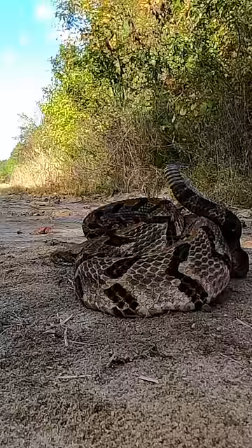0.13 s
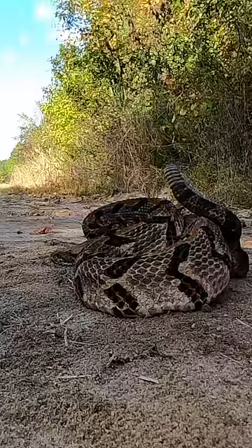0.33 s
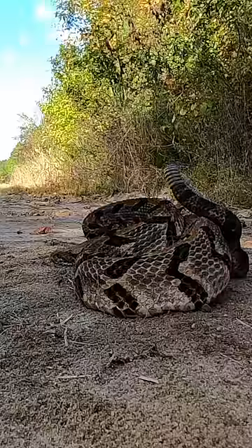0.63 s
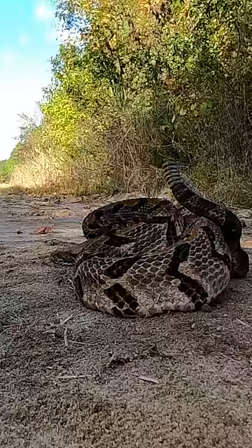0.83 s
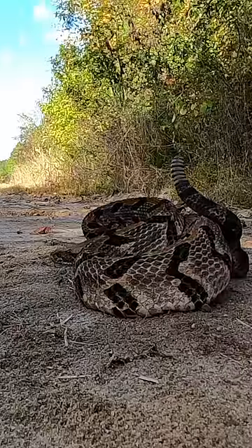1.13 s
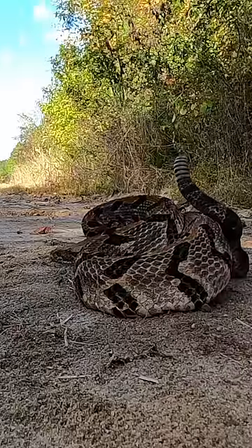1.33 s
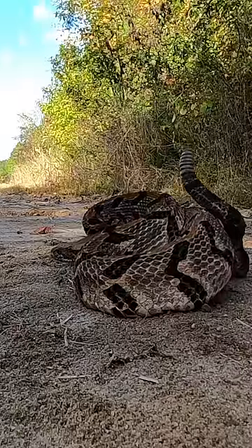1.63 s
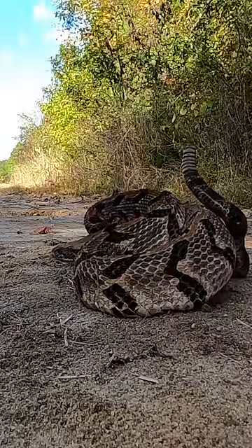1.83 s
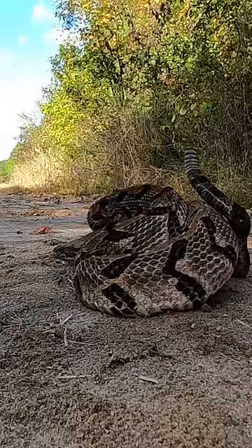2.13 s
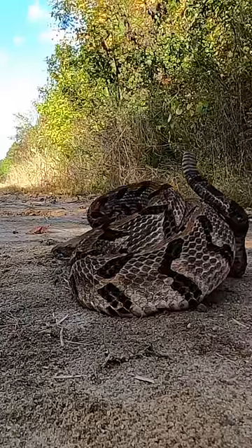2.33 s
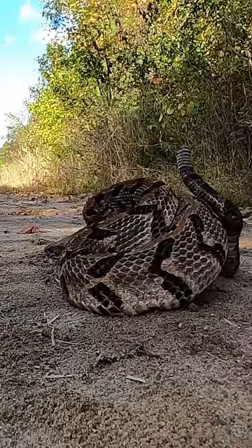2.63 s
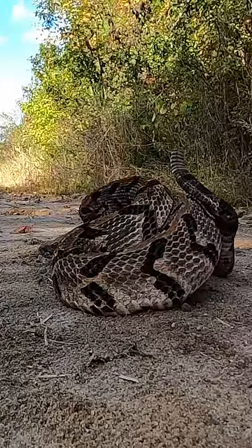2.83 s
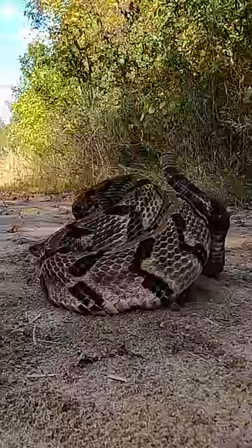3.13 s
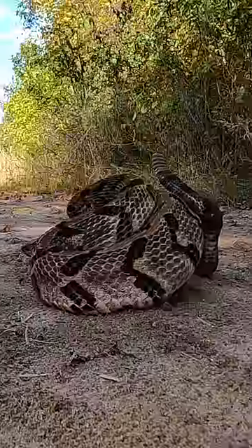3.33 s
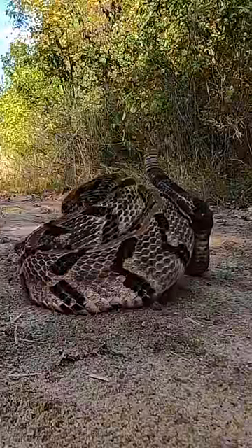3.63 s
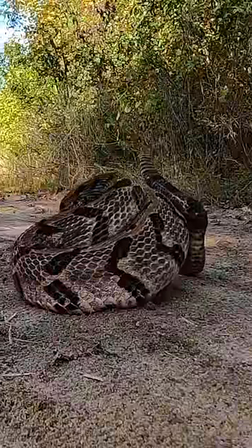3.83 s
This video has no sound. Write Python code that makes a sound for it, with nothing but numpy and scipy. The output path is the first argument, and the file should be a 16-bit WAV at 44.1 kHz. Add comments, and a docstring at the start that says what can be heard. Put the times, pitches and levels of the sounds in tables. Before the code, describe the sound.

A rattlesnake's rattle is the main sound, close and outdoors. First, two quieter footsteps thud and crunch on gritty sand to the left, at about 0.1 and 0.7 seconds. Near 1 second the tail gives one brief twitch, then a loud, dry, fast buzzing hiss holds steady until the end at 4 seconds. Faint distant rumble, thin insect hiss and wind on the microphone drop back once the rattling starts.

```python
"""Rattlesnake on a sandy track

Two footsteps thud and crunch on the left. A coiled rattlesnake twitches its tail once, then shakes it
about 58 times a second: the hollow segments clack together in four clusters per shake.
A distant rumble, a thin hiss of insects and wind on the microphone drop back when the rattle starts."""
import sys
import numpy as np
from scipy import signal
from scipy.fft import rfft, irfft
from scipy.io import wavfile

SR = 44100
rng = np.random.default_rng(int(sys.argv[2]) if len(sys.argv) > 2 else 0)


def digitize_waveform(pressure):
    """Quantize a signal to 16-bit integers and store it at the path in sys.argv[1].

    Rows of a 2-D input are taken as channels; values are limited to [-1, 1].
    """
    field = np.atleast_2d(pressure).T
    bounded = np.clip(field, -1, 1)
    quanta = np.round(bounded * 32767).astype(np.int16)
    wavfile.write(sys.argv[1], SR, quanta)


N = 176400  # 4 seconds

# The four moments in each shake when the segments collide: place (0 to 1), relative_db
CLACK_CLUSTERS = [(.0, -6.5), (.23, -1.5), (.5, -7), (.72, 1)]


def rattle():
    """Hollow tail segments collide: many small clacks bunch at each turn, with harder knocks on top."""
    # How hard the tail rattles: time_s, level_db
    shake_levels = [(.9572, -38), (.9595, -24), (.97, -18), (.973, -28), (.978, -22), (.989, -22),
                    (.996, -32), (1.021, -32), (1.024, -37), (1.04, -40), (1.048, -21.5), (1.1, -21),
                    (1.4, -21.5), (1.9, -20.5), (2.9, -20.5), (3.85, -21), (4, -22)]
    # How fast the tail shakes: time_s, shakes_per_s
    shake_speeds = [(1.0, 56), (1.2, 57.9), (1.5, 59.7), (1.8, 59.1), (2.4, 58.6), (3.0, 58.1), (3.6, 57.9),
                    (4.0, 57.3)]
    # Tone of the rattle together with its reflection off the ground: pitch_hz, early_db, late_db
    rattle_tone = [(300, -32.5, -29.5), (516, -20.5, -26), (753, -17, -19), (1000, -11, -9),
                   (1290, -10, -11), (2070, -10, -10.5), (2260, -6, -11), (2760, 1.5, -2), (3550, 2, -7),
                   (4000, 4.5, 3), (4490, 2, 2.5), (4907, -12, 4), (5280, -1, 0.5), (5670, 0.5, 3),
                   (6300, -1, 3), (7330, -0.3, 0.2), (7900, -6, -5.5), (8130, -3.5, -4),
                   (10900, -14, -11.5), (12500, -23, -18), (14100, -20.5, -26), (15500, -20, -28)]
    # The tone shifts as the microphone nears and the ground reflection changes: time_s, late_share (0 to 1)
    tone_change = [(1.4, 0.18), (2.3, 0.58), (3.2, 0.91)]
    # Tone of the diffuse rattle, with the microphone's narrow dip near 8 kHz: pitch_hz, relative_db
    diffuse_tone = [(200, 3), (1000, -4), (4000, 0), (7200, -2), (7700, -18), (8200, -18), (8600, 0),
                    (12000, -1), (15000, 2.5)]
    # Low hum of the swinging tail: multiple of the shake rate, relative_db
    swing_tones = [(3, -70), (5, -67), (9, -64.5), (12, -64), (14, -64)]
    cluster_width, loose_share = .064, .56  # share of a shake; share of clacks that fall anywhere
    (level_db,), (speed,), (late_share,) = map(over_time, (shake_levels, shake_speeds, tone_change))
    shakes = np.cumsum(speed) / SR  # shakes counted so far
    bunching = sum(amp(db) * np.exp(-.5 * (((shakes - place + .5) % 1 - .5) / cluster_width) ** 2)
                   for place, db in CLACK_CLUSTERS)
    clacks_per_s = 6000 * (loose_share + (1 - loose_share) * bunching / bunching.mean())
    # Three versions: one arrives directly, two make a diffuse sound on the left and right.
    clacks = contacts(clacks_per_s, spread_db=-.5, fade_s=.006, tick_db=5.5, versions=3)
    clacks[0] = unit_level(clacks[0] + amp(-5) * knocks(shakes))
    strength = amp(level_db) * (np.arange(N) > shake_levels[0][0] * SR)
    clacks = clacks * strength * amp(.19 * drift(24))
    early = colour(clacks, rattle_tone, column=1)
    late = colour(clacks, rattle_tone, column=2)
    direct, *diffuse = (1 - late_share) * early + late_share * late
    diffuse = amp(-6.5) * colour(np.array(diffuse), diffuse_tone)
    hum = sum(amp(db + 5.5) * np.sin(2 * np.pi * (k * shakes + rng.random())) for k, db in swing_tones)
    return microphone_ports(direct) + diffuse + hum * strength / strength.max()


def knocks(shakes):
    """Each turn of the tail throws the segments together: a tick and a short ring, never twice alike."""
    # The notes at which the hollow segments ring: pitch_hz, fade_s (time to fall 60 dB)
    segment_notes = [(2850, 0.0028), (3500, 0.0025), (4150, 0.0053), (5700, 0.0017), (6400, 0.0036),
                     (7000, 0.0033), (8800, 0.0047)]
    jitter_s, stagger_s, spread_db, ring_db = .0003, .0002, 1.4, -20
    places, cluster_db = np.transpose(CLACK_CLUSTERS)
    shake_count = int(shakes[-1])
    turns = (np.arange(shake_count)[:, None] + places).ravel()
    chance = rng.standard_normal((len(turns), 3 + 2 * len(segment_notes)))
    on_time = np.interp(turns, shakes, np.arange(N))
    starts = np.clip(on_time + jitter_s * SR * chance[:, 0], 0, N - 1).astype(int)
    sizes = amp(np.tile(cluster_db, shake_count) + spread_db * np.clip(chance[:, 1], -2, 2))
    sound = np.zeros(N)
    sound[starts] = sizes * np.sign(chance[:, 2])  # the bare ticks
    for k, (pitch_hz, fade_s) in enumerate(segment_notes):
        clicks = np.zeros(N)
        stagger = (stagger_s * SR * chance[:, -1 - k]).astype(int)
        clicks[np.clip(starts + stagger, 0, N - 1)] = sizes * amp(ring_db) * np.tanh(chance[:, 3 + k])
        sound += ring(clicks, pitch_hz, fade_s)
    return unit_level(sound)


def footsteps():
    """Heels thud in the middle; crunches, snaps and a skid reach the right side later and quieter."""
    left_db, right_db, right_delay_s = 1.5, -14, .00022
    t = np.arange(N) / SR
    cracking = snaps(t)
    crunch, right_crunch = grit_crunch(t)
    left = crunch + cracking + pebble_skid(t)
    right = np.interp(t - right_delay_s, t, left) + 1.6 * right_crunch
    return heel_thuds() + np.array([left * amp(left_db), right * amp(right_db)])


def grit_crunch(t):
    """Grains of grit grind under the sole until it lifts. Gives two versions of the same crunch."""
    # The crunch under the foot, one list per step: time_s, level_db, treble_db (relative to level_db)
    step_levels = [
        [(0.112, -71, -15), (0.118, -40, -19), (0.176, -43.5, -11), (0.19, -47.5, -13), (0.212, -42.5, -21),
         (0.272, -52.5, -16), (0.28, -54, -22), (0.29, -58, -17), (0.33, -74, -7)],
        [(0.698, -67, -12), (0.702, -44.5, -19), (0.752, -38, -18), (0.788, -45.5, -11), (0.803, -39.5, -23),
         (0.828, -45, -17), (0.85, -47, -17), (0.93, -68, -10)],
    ]
    # Tone of the grit: pitch_hz, relative_db
    grit_tone = [(470, -64), (800, -38), (989, -18), (1390, -11), (2000, 0), (4240, -4), (8000, -9.5),
                 (10400, -49), (17600, -120)]
    split_hz = 8000
    body_gain, treble_gain = np.zeros((2, N))
    for step in step_levels:
        level_db, treble_db = over_time(step)
        foot_down = (t > step[0][0]) & (t < step[-1][0])
        body_gain += foot_down * amp(level_db)
        treble_gain += foot_down * amp(level_db + treble_db)
    grit = contacts(per_s=2900 * amp(2 * drift(40)), spread_db=2.5, fade_s=.0073, tick_db=2.6, versions=2)
    body = let_through(colour(grit, grit_tone), "low", split_hz, order=3)
    softened = signal.lfilter([1, 1], [1], grit)
    treble = let_through(softened, "high", split_hz, order=3)
    return body_gain * body + treble_gain * unit_level(treble)


def snaps(t):
    """Pebbles and twigs snap underfoot, each in a short run of cracks that sets it ringing."""
    # One row per snap: start_s, peak_db, pitch_hz, fade_s, top_hz
    snap_list = [(0.0533, -28, 1530, 0.0062, 2620), (.1185, -30, 4200, .002, 9000),
                 (.1305, -38, 3000, .002, 6000), (.1782, -27, 4500, .0015, 14000),
                 (.2155, -31, 4700, .005, 7000), (0.2798, -32, 1580, 0.0059, 4500),
                 (.7036, -31, 2090, 0.0046, 9000), (.7246, -25, 3200, .002, 7500),
                 (.7472, -26, 3470, .002, 6500), (0.75, -36, 3300, .003, 6000),
                 (.779, -29, 4000, .003, 6000), (.8088, -20, 2500, .0015, 12000),
                 (.868, -32.5, 1700, 0.0071, 3500)]
    crumble_s = .00008
    sound = np.zeros(N)
    for start_s, peak_db, pitch_hz, fade_s, top_hz in snap_list:
        cracks = (t >= start_s) * np.exp(-np.maximum(t - start_s, 0) / crumble_s) * rng.standard_normal(N)
        dull_cracks = let_through(cracks, "low", 1.5 * pitch_hz, order=1)
        snap = ring(cracks, pitch_hz, fade_s) + 4 * dull_cracks
        snap = let_through(snap, "band", [pitch_hz / 2, top_hz], order=3)
        sound += amp(peak_db) * snap / abs(snap).max()
    return sound


def pebble_skid(t):
    """A pebble skids in the second step: a high scratch that swells and fades."""
    peak_s, swell_s, pitch_hz, fade_s = .8385, .003, 5700, .0015
    scratch = ring(ring(rng.standard_normal(N), pitch_hz, fade_s), pitch_hz, fade_s)
    swell = np.exp(-.5 * ((t - peak_s) / swell_s) ** 2)
    return amp(-37) * swell * unit_level(scratch)


def heel_thuds():
    """Each heel lands on the sand with a soft, low thud."""
    # The heel landings: start_s, level_db
    landings = [(0.121, -26.5), (0.705, -30)]
    hits = np.zeros(N)
    for start_s, level_db in landings:
        hits[int(start_s * SR)] = amp(level_db)
    return let_through(ring(hits, pitch_hz=195, fade_s=.026), "high", 120, order=2)


def background():
    """Rumble, insects and wind, which the recorder turns down when the rattle starts."""
    # Background level as heard: time_s, air_db (rumble and insects), wind_db
    heard_levels = [(0, -51, -62), (.15, -49, -54), (.4, -52, -58.5), (.7, -52, -57), (.93, -50, -56),
                    (1.0, -56.5, -71), (2.5, -58, -73), (4, -58, -67)]
    air_db, wind_db = over_time(heard_levels)
    air = distant_rumble() + insects()
    gusts = amp(wind_db) * wind()
    return amp(air_db + 1.6 * drift(9.1)) * air + gusts


def distant_rumble():
    """Far-off rumble and rustle: noise that is partly the same on the left and right."""
    # Tone of the distant noise: pitch_hz, relative_db
    rumble_tone = [(60, -32), (105, -26), (150, 0), (215, -4.5), (380, -13), (700, -20.5), (1150, -15),
                   (2200, -21), (3900, -29.5), (5500, -27), (7600, -29), (9000, -38.5), (13000, -49),
                   (15500, -59)]
    # How alike the two sides are: pitch_hz, likeness (1 the same, -1 opposite)
    side_likeness = [(60, -0.22), (240, 0.61), (950, 0.29), (3770, 0.011), (15000, -0.32)]
    shared, opposed = rfft(colour(rng.standard_normal((2, N)), rumble_tone))
    alike = over_pitch(side_likeness, np.fft.rfftfreq(N, 1 / SR))
    spectrum = np.sqrt(1 + alike) * shared + np.sqrt(1 - alike) * opposed * [[1], [-1]]
    return irfft(spectrum, N) / np.sqrt(2)


def insects():
    """Insects make a thin, high band of hiss that throbs at random."""
    relative_db, throb_db = -24, 4
    hiss = ring(rng.standard_normal((2, N)), pitch_hz=7150, fade_s=.012)
    return unit_level(hiss) * amp(relative_db + throb_db * drift(25))


def wind():
    """Wind buffets the two microphone openings: a deep rumble with separate gusts on each."""
    gust_db, opposed_share = 4, .29
    rumble = let_through(rng.standard_normal((2, N)), "band", [15, 62], order=2)
    gusts = amp([gust_db * drift(5), gust_db * drift(4.3)])
    return unit_level((rumble - opposed_share * rumble[::-1]) * gusts)


def microphone_ports(sound):
    """One sound enters the microphone's two openings, each with its own timing and level."""
    # How far the left wave runs ahead of the right: pitch_hz, lead_radians
    left_lead = [(0, -.3), (1500, -.5), (2100, -.33), (2700, -.75), (3900, -1), (4500, -1.55),
                 (5200, -1.65), (5800, -1.2), (6900, -1.75), (7600, -3.14), (8200, -3.14), (8600, -2.2),
                 (9300, -1.9), (10000, -2), (10500, -2.95), (16000, -3.14)]
    # How much louder the left is than the right: pitch_hz, level_db
    left_louder = [(200, -2), (700, -2), (1500, -2), (2500, -0.1), (3500, 0.5), (4500, 0), (5600, -6.5),
                   (7000, 3.5), (7600, 0), (8200, 0), (8600, -10), (10500, 0), (13000, -3), (15000, -3.5)]
    size, centre = 512, 256  # samples
    hz = np.fft.rfftfreq(size, 1 / SR)
    lead = np.interp(hz, *np.transpose(left_lead))
    half = np.log(amp(over_pitch(left_louder, hz) / 2)) + .5j * lead  # each side takes half
    taps = np.roll(irfft(np.exp([half, -half])), centre, axis=1) * np.hanning(size + 1)[:-1]
    return signal.fftconvolve(sound[None], taps, axes=1)[:, centre:centre + N]


def contacts(per_s, spread_db, fade_s, tick_db, versions):
    """Tiny random hits, each a tick and a dying puff of noise. All versions share the same hits."""
    hits = rng.random(N) < per_s / SR
    sizes = hits * amp(spread_db * np.minimum(rng.exponential(1, N), 4))
    energy = signal.lfilter([1], [1, -amp(-120 / (fade_s * SR))], sizes ** 2 + 1e-18)
    puffs = np.sqrt(energy) * rng.standard_normal((versions, N))
    ticks = amp(tick_db) * sizes * rng.choice([-1, 1], (versions, N))
    return unit_level(puffs + ticks)


def ring(clicks, pitch_hz, fade_s):
    """Each click starts a pure tone that falls 60 dB in fade_s."""
    decay, angle = amp(-60 / (fade_s * SR)), 2 * np.pi * pitch_hz / SR
    return signal.lfilter([0, np.sin(angle)], [1, -2 * decay * np.cos(angle), decay ** 2], clicks + 1e-18)


def colour(sound, rows, column=1):
    """Give a sound the tone in a table, falling 12 dB an octave below its first row."""
    size = 4096
    hz = np.fft.rfftfreq(size, 1 / SR)
    bass_cut = 2 * np.log(np.clip((hz + 1) / rows[0][0], 0, 1))
    cepstrum = irfft(np.log(amp(over_pitch(rows, hz, column))) + bass_cut)
    # Keeping only the first half makes the filter ring after a hit, never before it.
    cepstrum[1:size // 2] *= 2
    cepstrum[size // 2 + 1:] = 0
    taps = unit_level(irfft(np.exp(rfft(cepstrum)))) / np.sqrt(size)
    return signal.fftconvolve(sound, taps[None], axes=-1)[:, :N]


def let_through(sound, kind, edge_hz, order):
    """Keep the "low", "high" or "band" part of a sound; a higher order cuts more sharply."""
    return signal.sosfilt(signal.butter(order, edge_hz, kind, fs=SR, output="sos"), sound)


def drift(rate_hz):
    """A smooth random wobble around zero, of typical size 1."""
    decay = np.exp(-2 * np.pi * rate_hz / SR)
    slow = signal.lfilter([1], [1, -2 * decay, decay ** 2], rng.standard_normal(N + SR))[SR:]
    return unit_level(slow - slow.mean())


def over_time(rows):
    """Join a table's points with straight lines, giving each column a value at every sample."""
    time_s, *columns = np.transpose(rows)
    return [np.interp(np.arange(N) / SR, time_s, column) for column in columns]


def over_pitch(rows, hz, column=1):
    """Read one column of a table at the given pitches."""
    rows = np.array(rows, float)
    return np.interp(np.log(hz + 1), np.log(rows[:, 0] + 1), rows[:, column])


def amp(db):
    """Turn decibels into a number to multiply by."""
    return 10 ** (np.asarray(db) / 20)


def unit_level(sound):
    """Scale a sound to an average (RMS) level of 1."""
    return sound / np.sqrt(np.mean(sound ** 2) + 1e-20)


def scene():
    """The snake, the walker and their surroundings, in stereo."""
    return rattle() + footsteps() + background()


def record(dry):
    """Round off loud peaks and cut the highest treble."""
    ceiling, cutoff_hz = .8, 15725
    rounded = ceiling * np.tanh(dry / ceiling)
    return signal.sosfilt(signal.ellip(14, .5, 90, cutoff_hz, fs=SR, output="sos"), rounded)


dry = scene()
out = record(dry)
digitize_waveform(out)
```